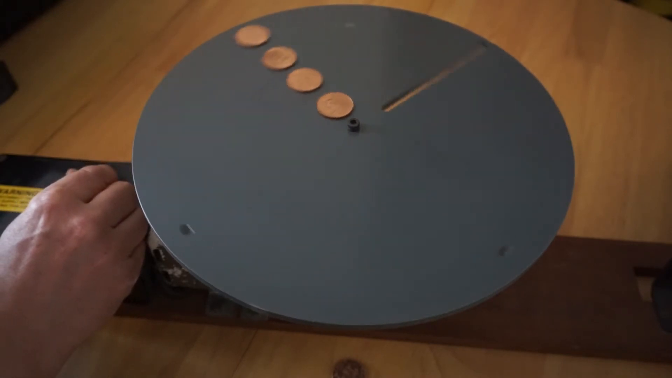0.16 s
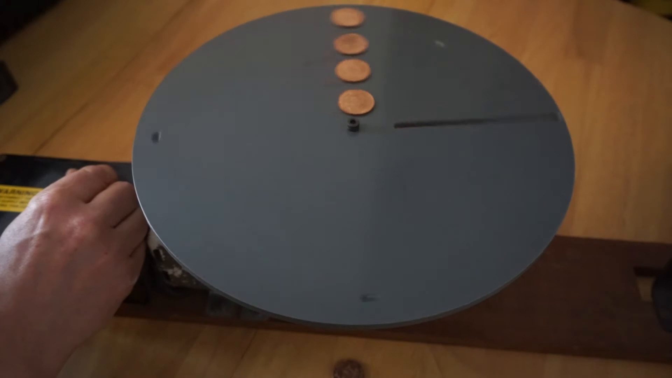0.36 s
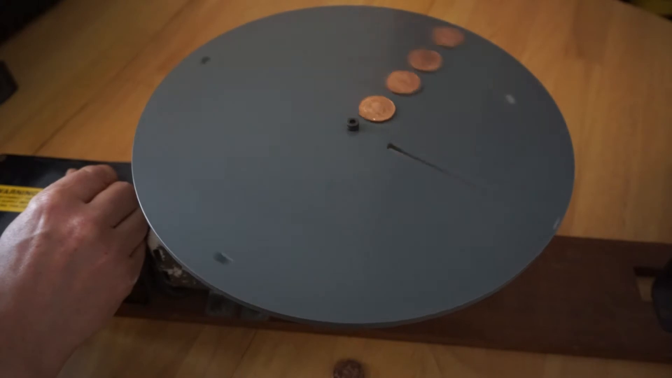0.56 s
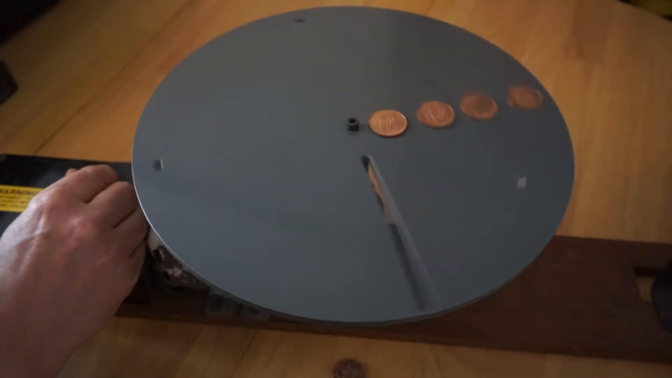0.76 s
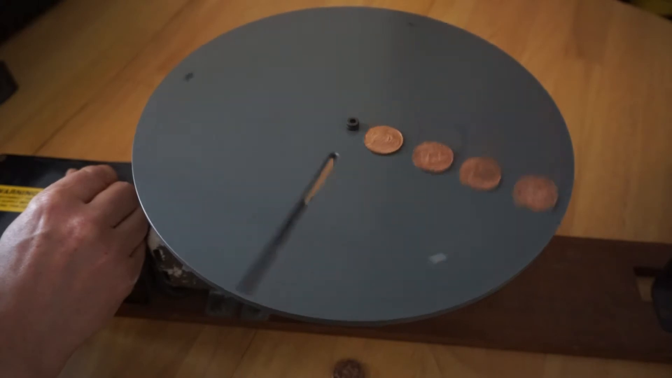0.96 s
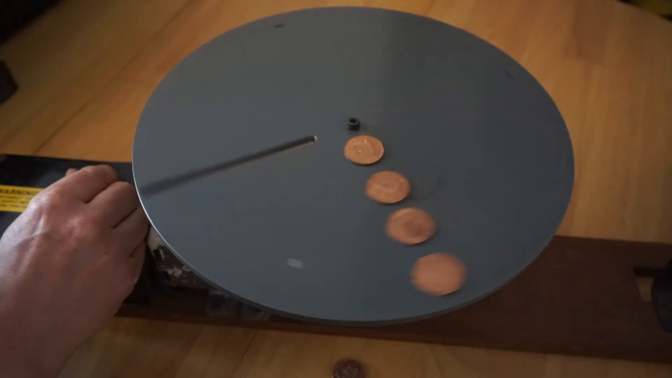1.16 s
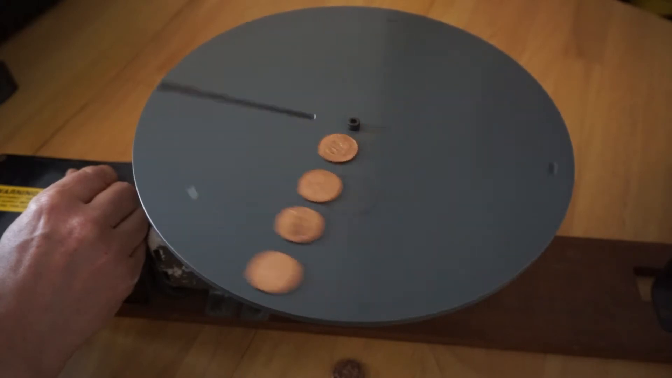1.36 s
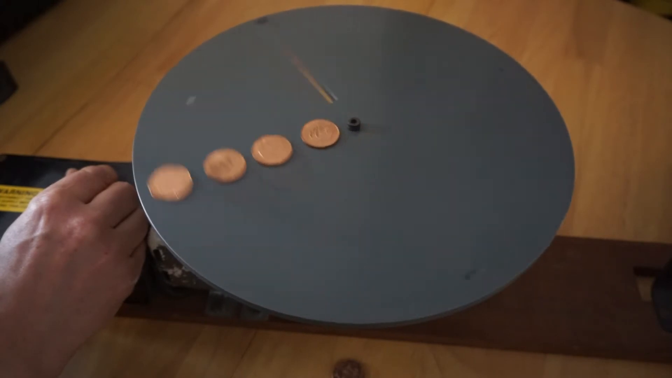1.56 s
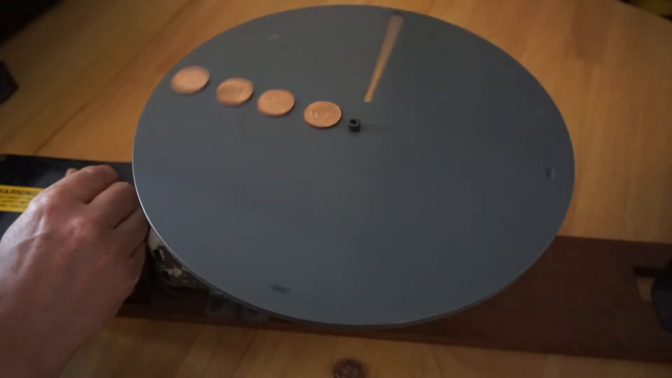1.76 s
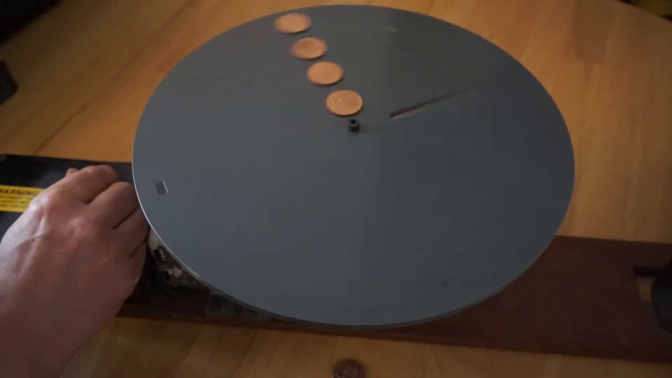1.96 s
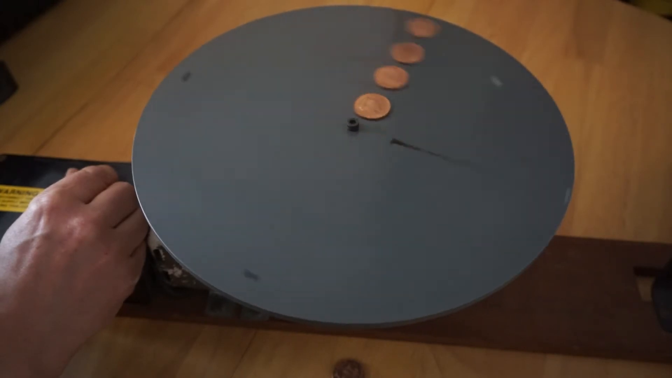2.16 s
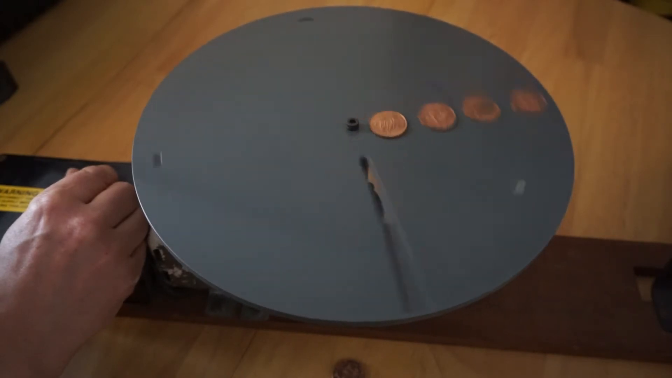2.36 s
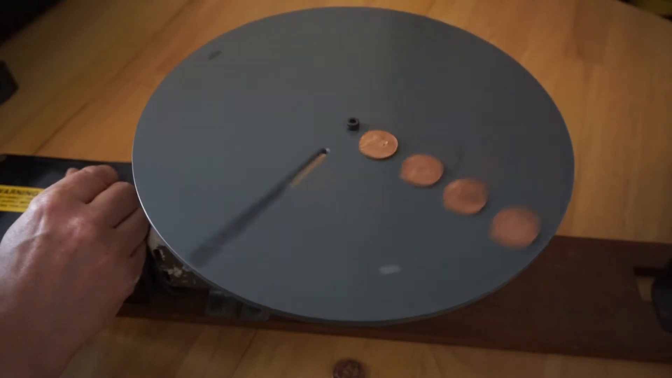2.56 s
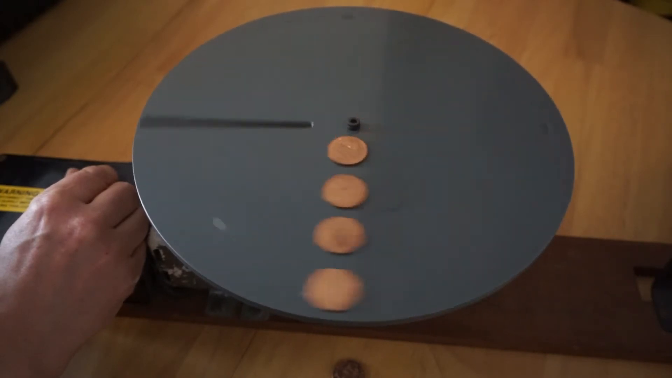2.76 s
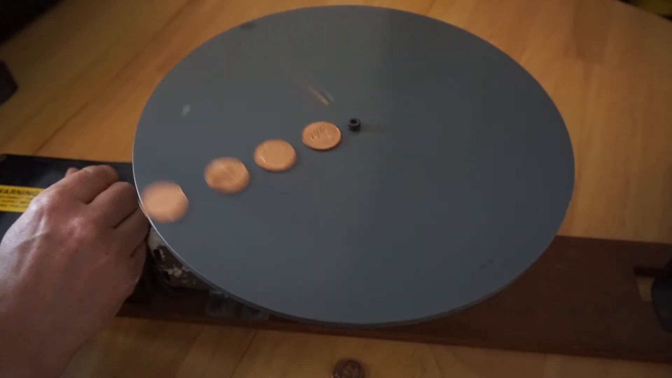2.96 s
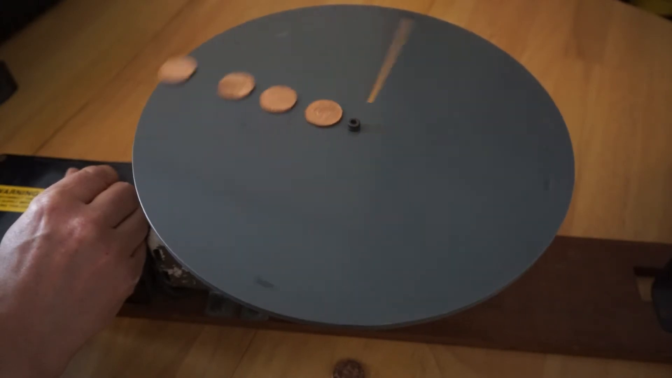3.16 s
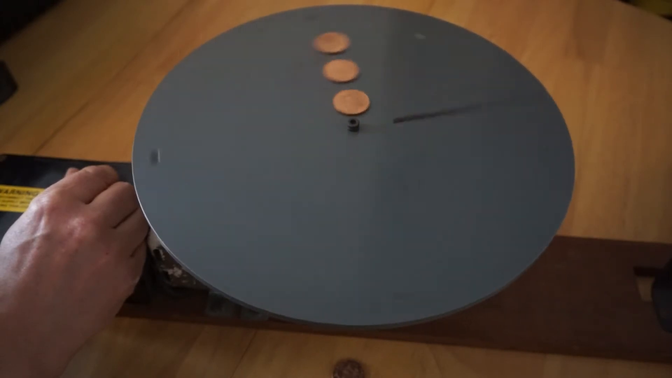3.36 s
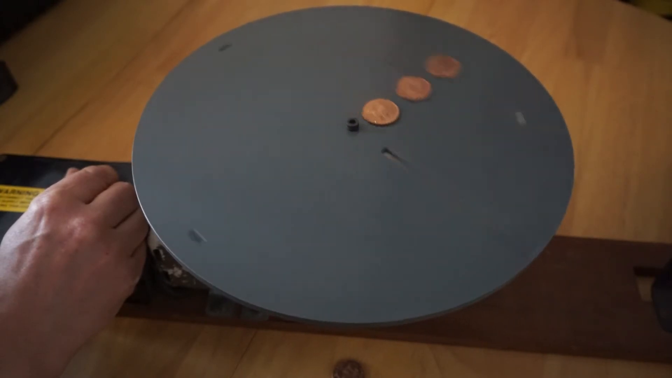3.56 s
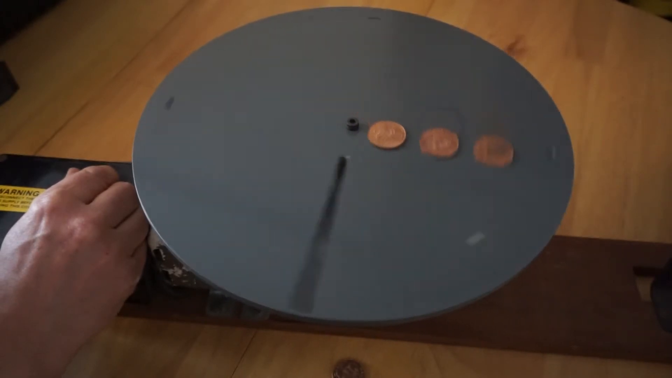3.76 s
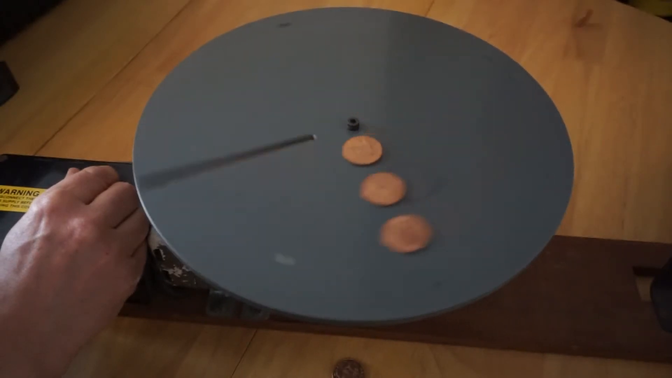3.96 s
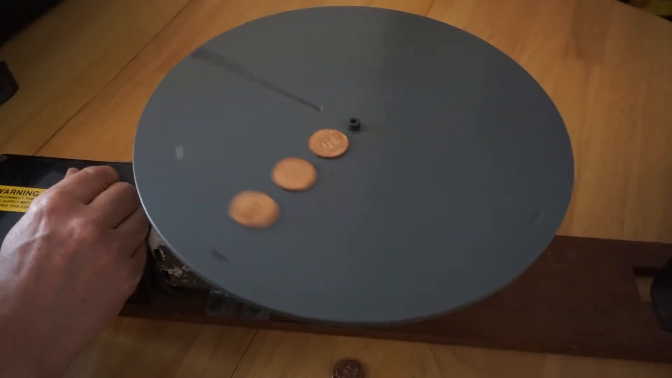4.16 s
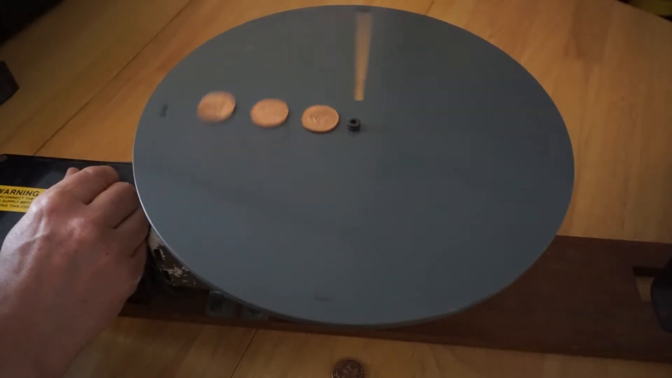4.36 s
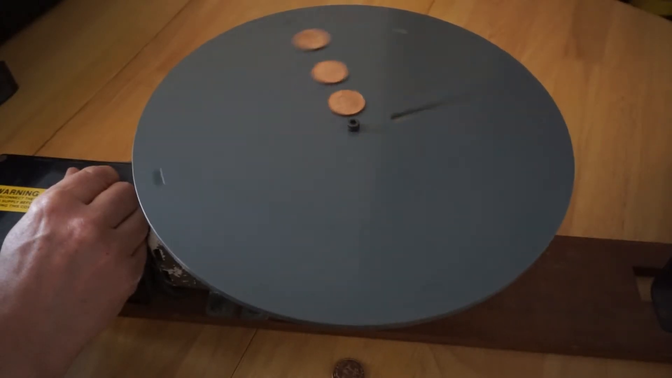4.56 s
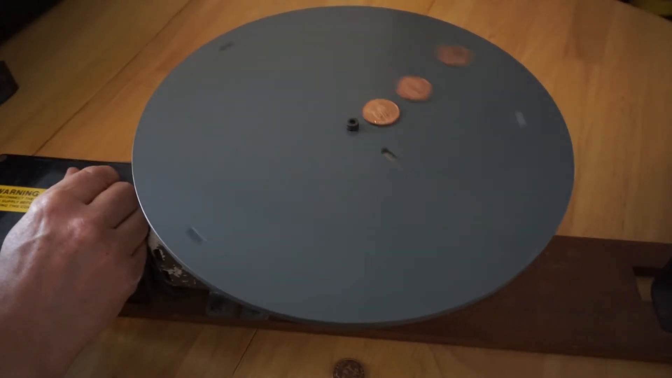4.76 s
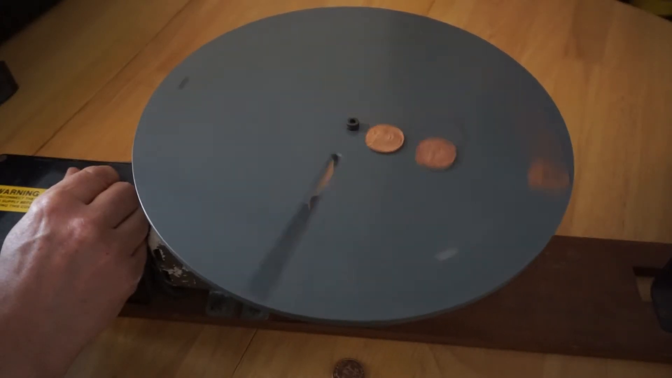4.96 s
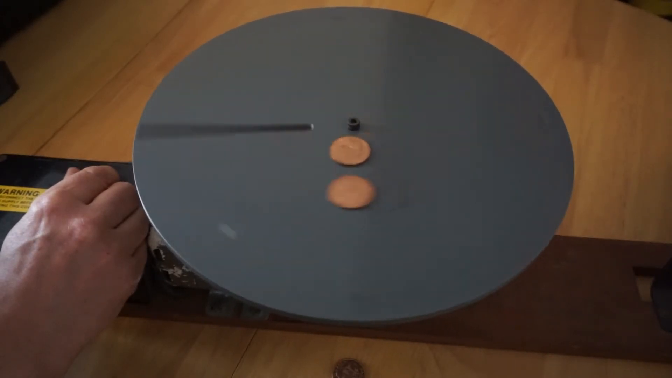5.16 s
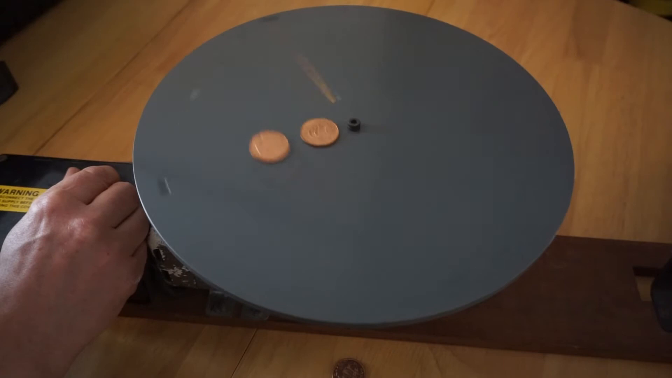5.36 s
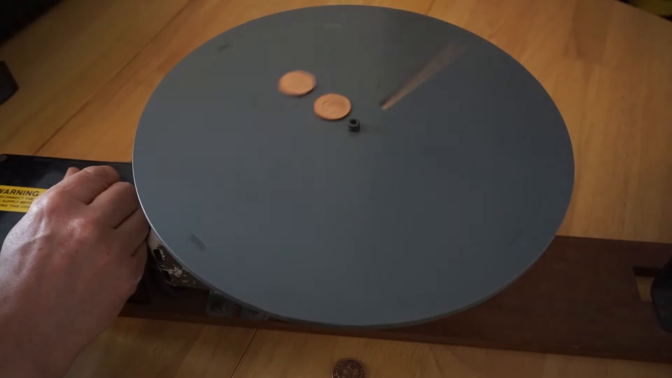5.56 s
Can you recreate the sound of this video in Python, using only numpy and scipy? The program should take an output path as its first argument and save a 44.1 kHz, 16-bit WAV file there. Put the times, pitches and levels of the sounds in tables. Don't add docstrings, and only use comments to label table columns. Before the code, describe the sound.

A small electric motor hums and rattles steadily, then two coins fly off a spinning disc, clattering and ringing on wood a couple of seconds apart.

```python
import sys
import numpy as np
from scipy import signal
from scipy.fft import rfft, irfft
from scipy.io import wavfile
from scipy.ndimage import uniform_filter1d

SR = 44100
rng = np.random.default_rng(int(sys.argv[2]) if len(sys.argv) > 2 else 0)


def int16_out(signal):
    q = np.round(np.clip(np.atleast_2d(signal).T, -1, 1) * 32767)
    wavfile.write(sys.argv[1], SR, q.astype(np.int16))


def voltage_ratio(decibels):
    exponent = np.asarray(decibels, float) / 20
    return 10 ** exponent


N = 247842
T = np.arange(N) / SR

PULL_HZ, PULL_START_S = 99.79, .0052

# multiple of the magnetic pull, level in dB.
HUM = [(1, -21), (2, -12.5), (3, 1), (4, 1), (5, -15.5), (6, -4.5), (7, -24), (8, -20.5), (9, -21.5),
       (10, -28.5), (11, -62), (12, -23), (13, -30.5), (14, -49), (15, -40.5), (16, -20.5), (17, -63),
       (18, -26.5), (19, -66)]
# pitch in Hz, width in Hz, level in dB, lead on the hum in ms.
HOUSING = [(2260, 360, 0, 4.5), (3110, 170, -14, 5.), (3560, 220, -13, 3.5), (4880, 260, -22, 4.),
           (5820, 420, -17, 5.8)]
# pitch in Hz, width in Hz, level in dB.
DISC_RINGS = [(699.5, 57, -41.5), (576.5, 28, -52), (510, 17, -57), (388, 83, -91)]
# time in seconds, pitch in Hz, level in dB.
SHAFT = [(0, 92, -66), (1.7, 110, -60), (2.9, 131, -53), (3.5, 143, -55), (5.62, 165, -62)]
# frequency in Hz, level in dB per Hz.
HISS = [(15, -54), (30, -2), (60, -11.5), (150, -10.5), (300, -12), (600, -4.5), (1000, -17.5), (1800, -13),
        (2300, -5), (4350, -19), (7000, -25), (10300, -34), (11000, -32), (14000, -35)]
# time in seconds, hum level in dB.
LOAD = [(0, -38), (1.2, -37), (3.4, -36.5), (5.62, -35.5)]
# frequency in Hz, side minus mid in dB.
WIDTH = [(30, -24), (70, -14), (200, -18), (380, -22), (700, -11), (1290, -4), (2380, -6), (4400, -1),
         (8120, 0), (15000, 1)]

# start in seconds, leaving time in seconds, level in dB.
SLIDES = [
    (2.6, 3.44, -57),
    (4.6, 5.13, -52),
]
# frequency in Hz, level in dB per Hz.
SLIDE_COLOUR = [(500, -12), (2000, 3), (6000, 1), (10000, 3), (14000, 3)]
# pitch in Hz, swell in seconds, ring time against the high mode, lobe angle in rad.
COIN_MODES = [(12397, .012, 1.01, 0.), (8497, .02, 1.1, .2), (7060, .035, 1.4, 1.3)]
# first landing in seconds, detune per thousand.
THROWS = [
    (3.468, 0),
    (5.256, -1.6),
]
# start in seconds, high mode in dB, low mode in dB, T60 in seconds.
STRIKES = [(3.468, -26, -37.5, 2.5), (3.54, -28, -29.5, 2.5), (3.59, -27, -35, 1.5), (3.623, -36, -51, 1.5),
           (3.645, -26.5, -41, 2.5), (3.692, -26, -41, 2.5), (3.74, -31.5, -36, 0.56),
           (3.8, -36, -42, 0.19), (3.855, -53, -57, 0.27), (4.6, -64, -78, 0.52), (5.03, -64, -104, 1.5),
           (5.075, -55, -85, 0.29), (5.256, -38, -63, 1.3), (5.28, -21.5, -48, .6), (5.307, -23, -36, 0.28),
           (5.39, -20.5, -36, .6), (5.47, -27, -43, .25), (5.536, -27, -37, .16)]
# start in seconds, turns per second, first edge-on moment in seconds,
# steady share from 0 to 1.
FLIGHTS = [(3.4, 21, 3.54, .985), (3.64, 16, 3.706, .85), (3.76, 16, 3.785, .93), (4.5, 9, 4.61, .8),
           (5.2, 20, 5.283, .05), (5.39, 14, 5.405, .93), (5.46, 17, 5.473, .75)]

# start in seconds, peak at 0.7-3 kHz in dB, bass in dB,
# treble in dB, early T60 in seconds.
ON_FLOOR = [(3.47, -7, -11, -6, 0.034), (3.478, -9, -16.5, -7, 0.037), (3.484, -11, -13, -1.5, 0.056),
            (3.623, -10.5, -11.5, -9.5, 0.047), (3.64, -9.5, -15, -6, 0.057),
            (3.692, -12.5, -13, -6, 0.077), (3.74, -7.5, -13.5, -14, 0.048), (3.759, -15, -33, -12, 0.033),
            (3.799, -14, -15, -24, 0.029), (3.848, -19, -15, -42, 0.069), (3.899, -25, -14, -38, 0.095),
            (3.928, -19.5, -20, -36, 0.044), (3.988, -19, -11, -23, 0.041),
            (4.089, -21.5, -7.5, -31, 0.074), (4.109, -21, -9, -44, 0.1),
            (4.132, -20.5, -11.5, -25.5, 0.14), (4.594, -11, -8, -23, 0.09), (4.614, -25, -5.5, -47, 0.04),
            (5.049, -30, -6, -3, 0.12), (5.081, -26.5, -6, -13, 0.068), (5.257, -10, -40, -4, 0.046),
            (5.267, -14.5, -14, 0.5, 0.085), (5.292, -17, -9, -6, 0.1)]
ON_METAL = [(5.3902, -14, -13.5, -1, 0.14), (5.396, -34, -28, 17, 0.07), (5.4154, -29, -6, 9, 0.046),
            (5.4204, -37, 0.5, 3, 0.068)]
ON_TABLE = [(4.5378, -19.5, 3, -46, 0.091), (4.5398, -28, 2, -16, 0.082), (4.5448, -24.5, -12, -40, 0.036),
            (4.6015, -32, -2.5, -29, .06), (4.764, -54.5, 9, -44, 0.027), (4.909, -46.5, 8, -16, 0.034)]
# pitch in Hz, level in dB, T60 in seconds.
BOARD_MODES = [(173.6, -3, 0.079), (246, -4, 0.06), (307, -2.5, 0.08), (439, -10.5, 0.21), (599, 0.5, 0.16),
               (735, -4.5, 0.18), (872, -19, 0.69), (1112, -0.5, 0.32), (1330, -20, 0.38),
               (1450, -0.5, 0.15), (1616, 2, 0.1), (2187, -3.5, 0.27), (2463, -1.5, 0.16), (2610, 5, 0.095),
               (2930, 8.5, 0.1), (3190, 7, 0.14), (3530, -5, 0.22), (4090, 3, 0.25)]
# pitch in Hz, level in dB, T60 in seconds.
METAL_MODES = [(3811, -22, .19), (4893, -27, .19), (9092, -37, .22), (10890, -37, .2), (11620, -39, .3),
               (13670, -44, .2)]
# start in seconds, centre in Hz, width in Hz, level in dB, T60 in seconds.
GRAZES = [(5.5555, 7200, 2500, -14.5, .012), (5.391, 12500, 6000, -31, .08), (5.415, 14400, 2200, -25, .2),
          (5.257, 2700, 2500, -8, .035), (5.39, 3000, 3500, -11, .012), (3.484, 4600, 2500, -17, .06)]
# pitch in Hz, level in dB, T60 in seconds.
TABLE_MODES = [(152, -16, 0.09), (180, -16, 0.095), (232, -23, .05), (320, -14.5, 0.084), (720, -22, .05)]
# start in seconds, level in dB.
BUMPS = [(4.5375, 0.3), (4.599, -14), (4.764, -17), (4.909, -18), (5.257, -16), (5.39, -17)]


def spectrum(table, hz):
    at, value = np.transpose(table)
    return np.interp(np.log(hz + 1), np.log(at), value)


def stereo_noise(size, colour=None):
    hz = np.fft.rfftfreq(size, 1 / SR)
    colour_db = 0 * hz if colour is None else spectrum(colour, hz)
    mid, side = rfft(rng.standard_normal((2, size))) * voltage_ratio(colour_db)
    side = side * voltage_ratio(spectrum(WIDTH, hz))
    return irfft(np.array([mid + side, mid - side]), size)


def resonate(x, hz, width, times=1):
    for _ in range(times):
        x = signal.lfilter(*signal.iirpeak(hz, hz / width, SR), x)
    return x


def walk(rate, channels=1):
    hold = int(SR / rate)
    steps = rng.standard_normal((channels, N // hold + 1))
    return uniform_filter1d(np.repeat(steps, hold, axis=1), hold)[:, :N]


def level(x, db):
    return x * voltage_ratio(db) / np.sqrt(np.mean(x ** 2))


def curves(table):
    s, *columns = np.transpose(table)
    return [np.interp(T, s, column) for column in columns]


def latest(table):
    table = np.array(table)
    return table[np.clip(np.searchsorted(table[:, 0], T) - 1, 0, None)].T


def lag(x, s):
    keep = np.exp(-1 / (max(s, 1e-4) * SR))
    return signal.lfilter([1 - keep], [1, -keep], x)


def hum():
    turn = 2 * np.pi * PULL_HZ * (T - PULL_START_S)
    out = 0
    for k, db in HUM:
        skew = rng.standard_normal((2, 1)) * np.clip(.008 * k ** 2, .08, .7)
        waver_db = .2 * min(k, 8) * walk(9)
        out = out + voltage_ratio(db + waver_db) * np.cos(k * turn + skew + .35)
    return out * np.sqrt(2)


def rattle():
    out = 0
    for hz, width, db, lead_ms in HOUSING:
        first_s = PULL_START_S - lead_ms / 1000 - .5 / (2 * width)
        pulls = np.arange(first_s, N / SR - .02, 1 / PULL_HZ)
        knocks = np.zeros((2, N))
        for late_s, knock_db in [(0., 0.), (.0051, -9)]:
            chance = rng.standard_normal((len(pulls), 4)).T
            at = np.clip((pulls + late_s + 2e-5 * chance[3]) * SR, 0, N).astype(int)
            knocks[:, at] = voltage_ratio(knock_db + 1.3 * chance[0] + .7 * chance[1:3])
        knocks[1] = np.roll(knocks[1], int(hz) % 4)
        ring = level(resonate(knocks, hz, 1.5 * width, times=3), 0)
        gate = 1 + .95 * np.cos(2 * np.pi * PULL_HZ * (T - pulls[0] - .001))
        spit = level(resonate(gate * stereo_noise(N), hz, 1.2 * width, times=2), -12)
        out = out + voltage_ratio(db + 1.4 * walk(14)) * (ring + spit)
    return level(out, 0)


def disc_rub():
    out = 0
    for hz, width, db in DISC_RINGS:
        ring = level(resonate(stereo_noise(N), hz, width, times=2), db)
        out = out + ring * voltage_ratio(1.8 * walk(5))
    return out


def shaft_tone():
    hz, db = curves(SHAFT)
    return voltage_ratio(db + 2.2 * walk(5.84)) * np.sin(2 * np.pi * np.cumsum(hz) / SR)


def brush_hiss():
    return level(stereo_noise(N, HISS), -39) * voltage_ratio(2.0 * walk(20, channels=2))


def motor():
    hum_db, = curves(LOAD)
    rattle_db = -2.5
    friction = disc_rub() + shaft_tone() + brush_hiss()
    return voltage_ratio(hum_db) * (hum() + voltage_ratio(rattle_db) * rattle() + voltage_ratio(33.5) * friction)


def slides():
    grow = 0
    for start, leaves, db in SLIDES:
        grow = grow + voltage_ratio(db) * np.interp(T, [start, leaves, leaves + .08], [0, 1, 0]) ** 1.2
    return grow * voltage_ratio(2.2 * walk(25.5)) * level(stereo_noise(N, SLIDE_COLOUR), 0)


def coins():
    struck, high_db, low_db, t60 = latest(STRIKES)
    _, turns, edge_on, steady = latest(FLIGHTS)
    landed, detune = latest(THROWS)
    sag_per_s = .006
    pitch = 1 + detune / 1000 - sag_per_s * np.clip(T - landed, 0, .3)
    turn = 2 * np.pi * turns * (T - edge_on)
    apart = np.array([[.16], [-.16]])
    middle_db = high_db - 18
    out = 0
    for db, (hz, swell_s, longer, lobe) in zip((high_db, middle_db, low_db), COIN_MODES):
        decay = voltage_ratio(db - 60 * np.abs(T - struck) / (longer * t60))
        ring = lag((T > struck) * decay, swell_s)
        beam = steady + np.sqrt(2 * (1 - steady ** 2)) * np.sin(turn + lobe + apart)
        beam = uniform_filter1d(beam, SR // 300)
        wave = 2 * np.pi * np.cumsum(hz * pitch + 6.0 * walk(60)) / SR
        wave = wave + 4.7 * apart + .62 * walk(75, channels=2)
        tone = np.sin(wave) + voltage_ratio(-23) * np.sin(.9755 * wave)
        out = out + ring * voltage_ratio(6 + 2.4 * walk(150, channels=2)) * beam * tone
    return out


def modes(table, t, chance):
    out = 0
    for (hz, db, t60), (size, phase, skew) in zip(table, chance):
        shift = np.array([[skew], [-skew]]) * min(hz / 2500, 2)
        decay = voltage_ratio(db + 3.2 * size - 60 * t / t60)
        out = out + decay * np.sin(2 * np.pi * hz * t + .4 * phase + shift)
    return out


def causal(colour_db):
    size = 2 * len(colour_db) - 2
    cepstrum = irfft(colour_db * np.log(10) / 20, size)
    cepstrum[1:size // 2] *= 2
    cepstrum[size // 2 + 1:] = 0
    return np.exp(rfft(cepstrum))


def room_tail(noise, t):
    room_t60_s, room_db = 0.47, -8.5
    return noise[:, ::-1] * voltage_ratio(room_db - 60 * t / room_t60_s) * np.minimum(t / 0.019, 1)


def blow(row, knee_db, push_db, top_db):
    _, db, bass_db, treble_db, t60 = row
    size = SR // 2
    t, hz = np.arange(size) / SR, np.fft.rfftfreq(2 * size, 1 / SR)
    air_db = top_db + 0.68 * treble_db
    colour = [(40, 3.4 * bass_db - 14), (170, 2.49 * bass_db + 13.0), (300, 1.32 * bass_db + 14),
              (500, bass_db + 11), (1000, knee_db), (1500, 0), (2400, 0.018), (4500, treble_db + 0.5),
              (10000, air_db), (12500, air_db + 10), (14000, air_db - 19)]
    noise = level(stereo_noise(size), 0)
    rise = np.minimum(t / (0.00039 * voltage_ratio(-db)), 1)
    body = noise * voltage_ratio(-60 * t / max(t60, .01)) * rise
    body[:, 0] = -voltage_ratio(push_db)
    chance = rng.standard_normal((len(BOARD_MODES), 3))
    board = voltage_ratio(-26.5 + 0.2 * push_db) * modes(BOARD_MODES, t, chance) * rise
    fade = np.cos(np.pi / 2 * t / t[-1])
    dull = voltage_ratio(spectrum([(100, 1.5), (3000, -2), (6000, -4.5), (10000, -1), (16000, -28)], hz))
    both = rfft(body, 2 * size) + dull * rfft((room_tail(noise, t) + board) * fade, 2 * size)
    nearer_right = voltage_ratio(np.array([[-1.3], [1.3]]) * np.clip(hz / 1500, 0, 1))
    return irfft(both * nearer_right * causal(spectrum(colour, hz) + db + 6.0))


def metal_ring():
    chance = 0.056 * rng.standard_normal((len(METAL_MODES), 3))
    return modes(METAL_MODES, np.arange(SR // 2) / SR, chance)


def graze(hz, width, db, t60):
    t = np.arange(SR // 2) / SR
    decay = voltage_ratio(db - 60 * t / t60) + voltage_ratio(db - 11 - 60 * t / 0.2)
    return resonate(rng.standard_normal((2, len(t))) * decay, hz, width, times=2)


def hits():
    out = np.zeros((2, N + SR))

    def place(s, sound):
        start = int(s * SR)
        out[:, start:start + sound.shape[1]] += sound

    for row in ON_FLOOR:
        place(row[0], blow(row, knee_db=-1.5, push_db=8, top_db=-31))
    for row in ON_METAL:
        place(row[0], blow(row, knee_db=-20, push_db=6.4, top_db=-9.5))
    for row in ON_TABLE:
        place(row[0], blow(row, knee_db=10.3, push_db=22, top_db=-26))
    place(5.421, metal_ring())
    for s, hz, width, db, t60 in GRAZES:
        place(s, graze(hz, width, db, t60))
    return out[:, :N]


def table_flex():
    flex = 0
    for s, db in BUMPS:
        for hz, mode_db, t60 in TABLE_MODES:
            decay = (T > s) * voltage_ratio(db + mode_db - 60 * np.abs(T - s) / t60)
            flex = flex + decay * np.sin(2 * np.pi * hz * (T - s))
    return signal.sosfilt(signal.butter(2, 110, "high", fs=SR, output="sos"), flex)


def ducking(loud):
    threshold_db, share, sense_s, release_db_s = -30, .6, .03, 45
    memory_share, memory_s = 2.1, 0.74
    loud_db = 10 * np.log10(lag(np.mean(loud ** 2, axis=0), sense_s) + 1e-12)
    over_db = share * np.maximum(loud_db - threshold_db, 0)
    held_db = np.maximum.accumulate(over_db + release_db_s * T) - release_db_s * T
    return voltage_ratio(-held_db - memory_share * lag(held_db, memory_s))


def scene():
    loud = hits() + coins() + table_flex()
    motor_left_db = .3
    pan = voltage_ratio(np.array([[.5], [-.5]]) * motor_left_db)
    return ducking(loud) * (motor() + slides()) * pan + loud


def roll_off(x):
    return signal.sosfilt(signal.butter(12, 16080, fs=SR, output="sos"), x)


def record(dry):
    limited = np.tanh(1.092 * dry) / 1.11
    low_pass = signal.ellip(10, .2, 80, 15850, fs=SR, output="sos")
    return roll_off(signal.sosfilt(low_pass, limited))


dry = scene()
out = record(dry)
int16_out(out)
```